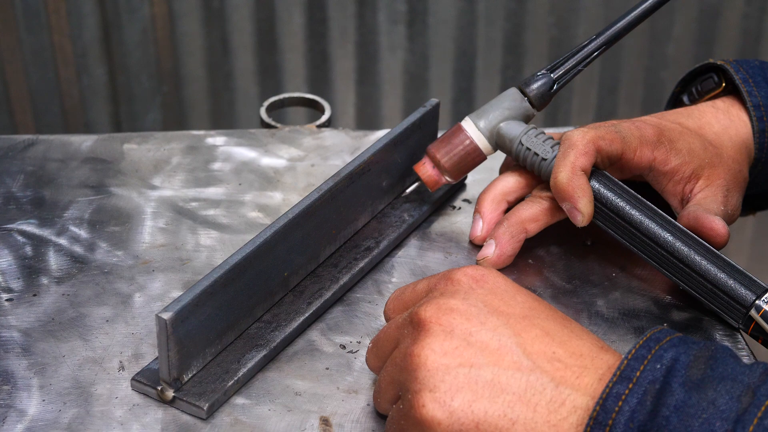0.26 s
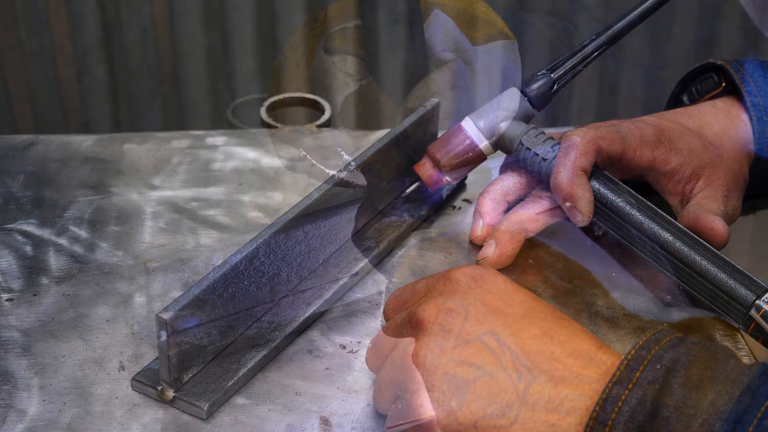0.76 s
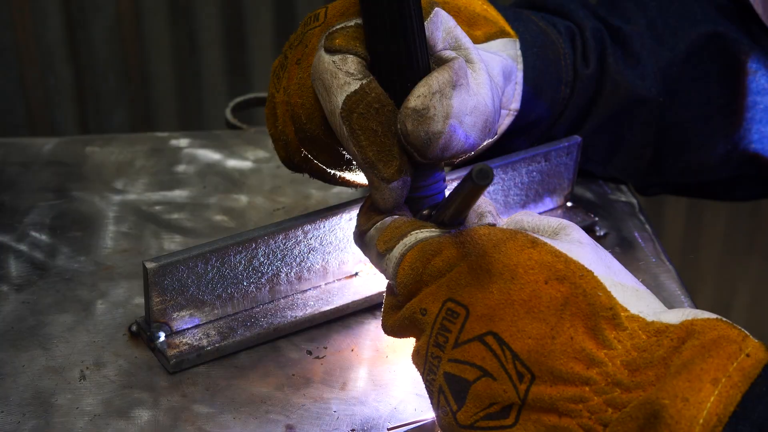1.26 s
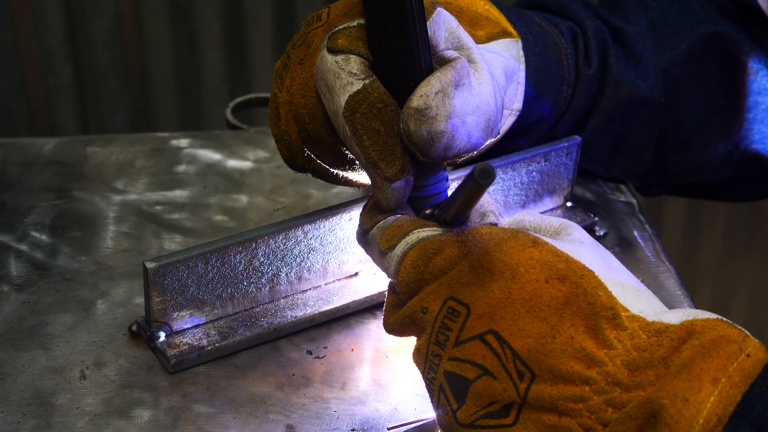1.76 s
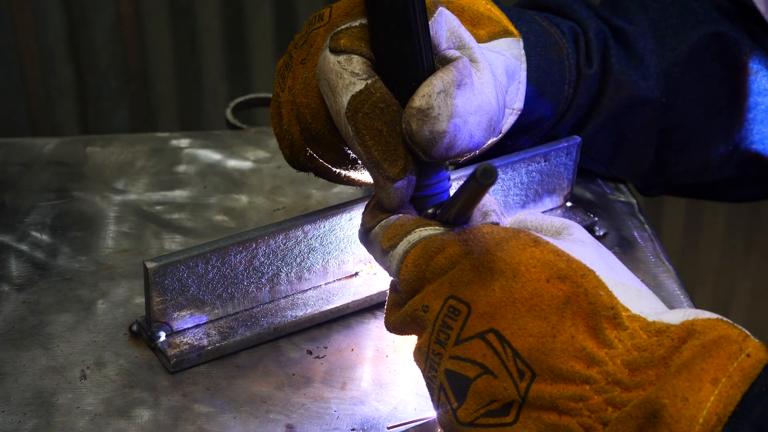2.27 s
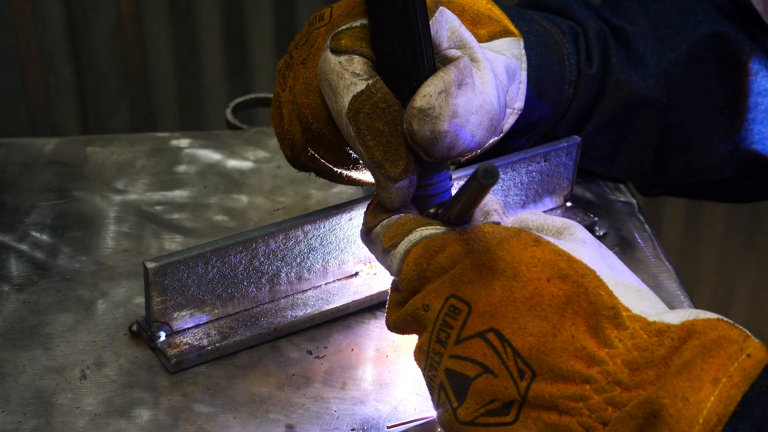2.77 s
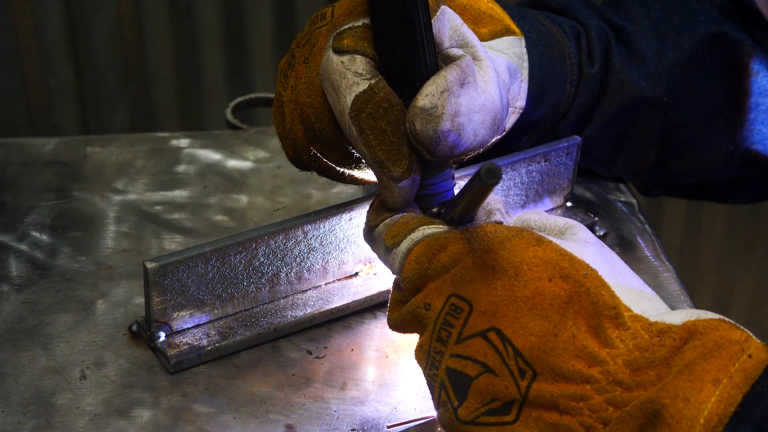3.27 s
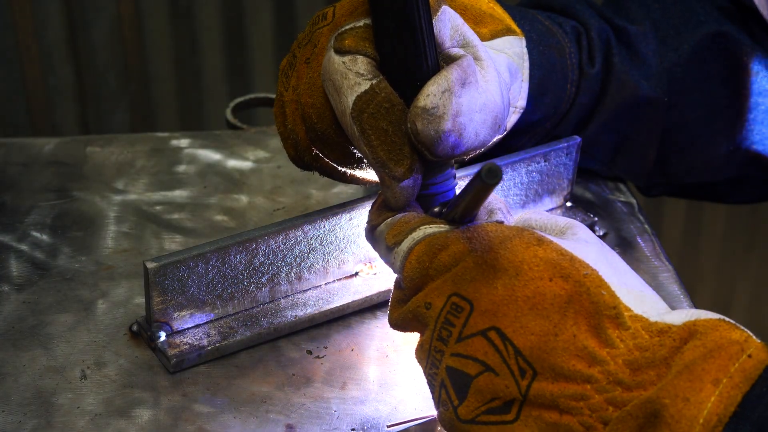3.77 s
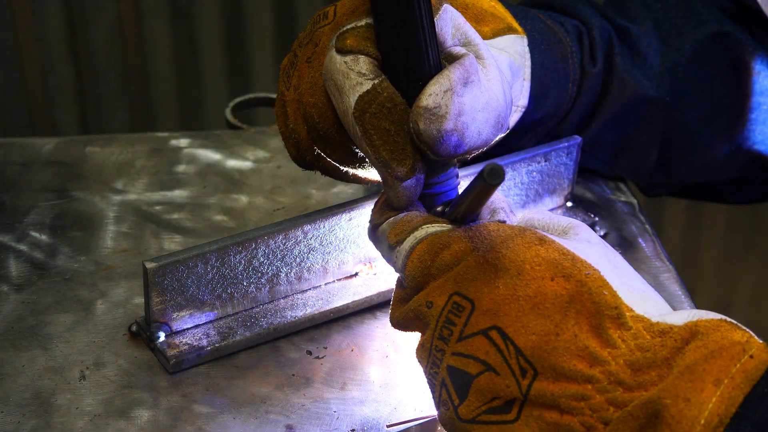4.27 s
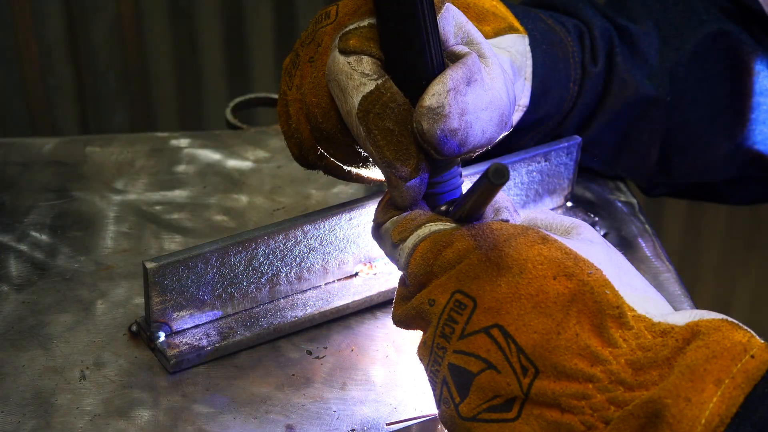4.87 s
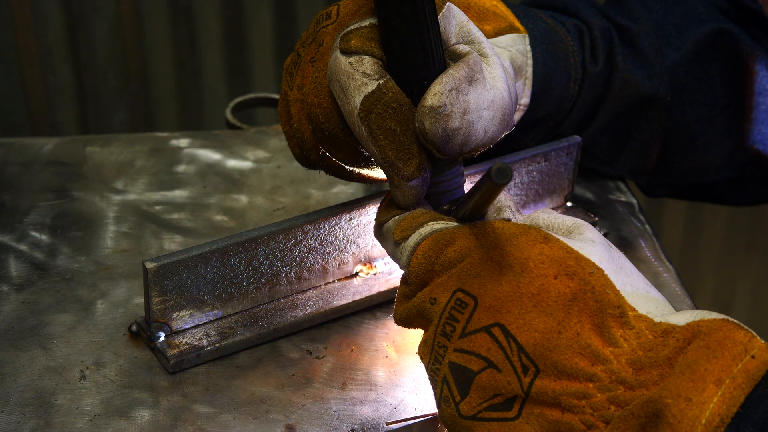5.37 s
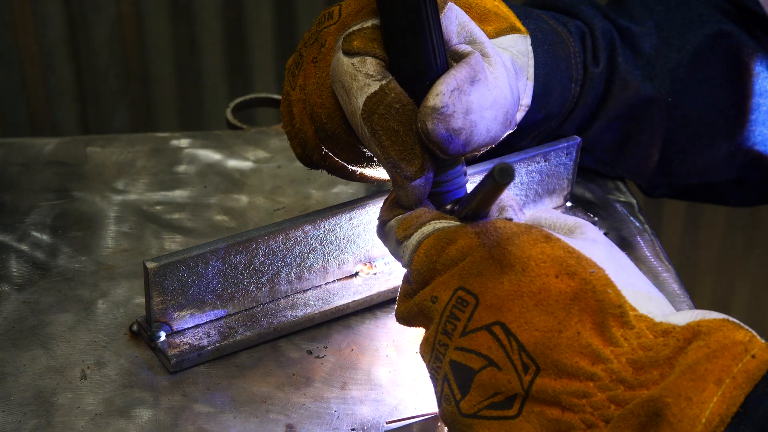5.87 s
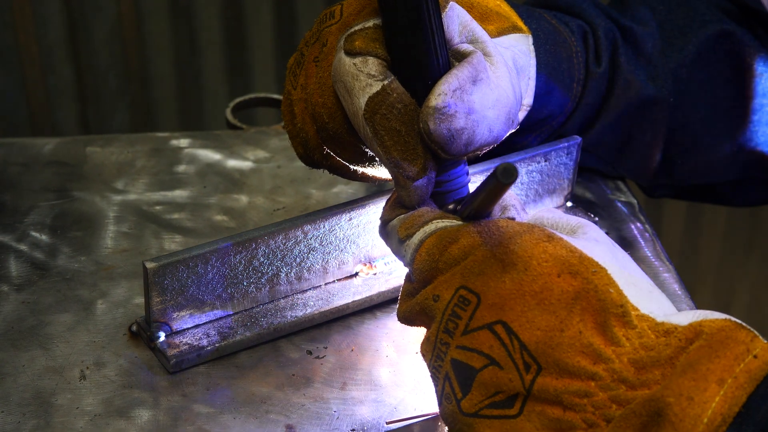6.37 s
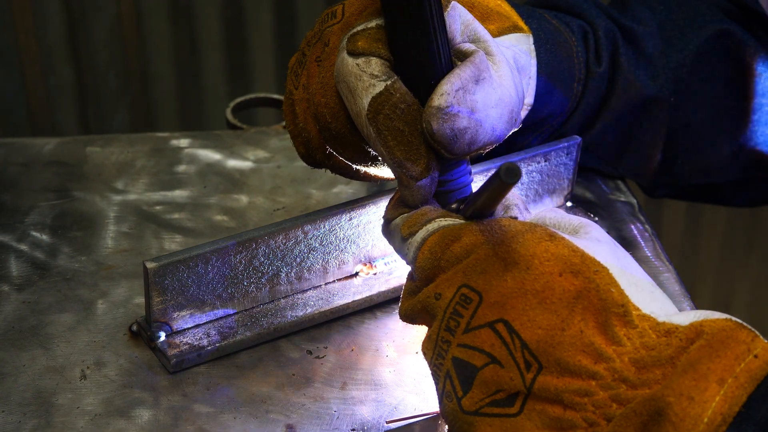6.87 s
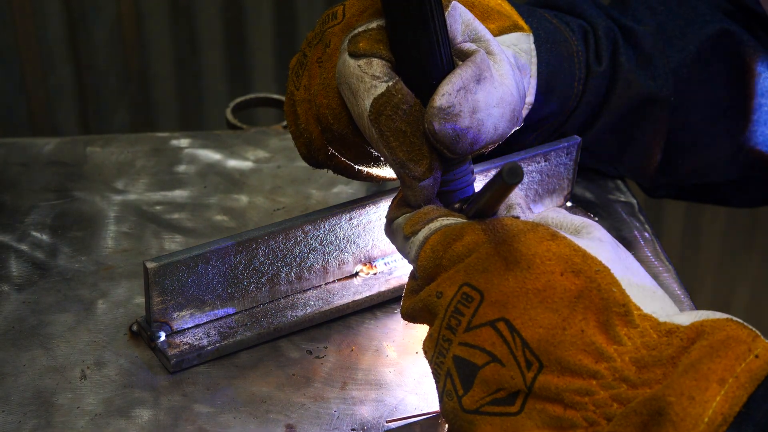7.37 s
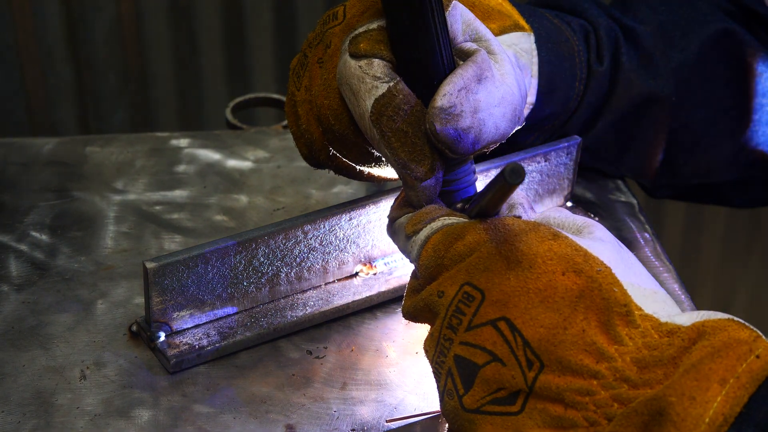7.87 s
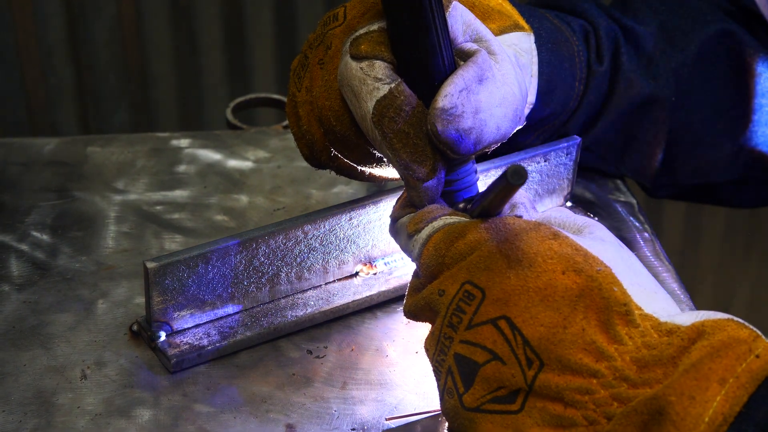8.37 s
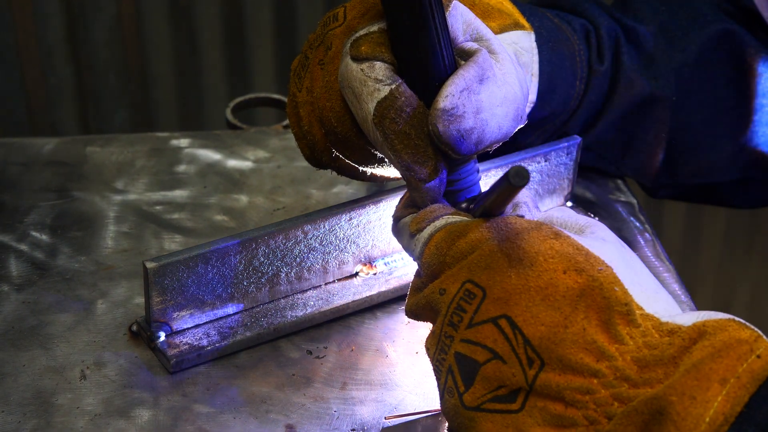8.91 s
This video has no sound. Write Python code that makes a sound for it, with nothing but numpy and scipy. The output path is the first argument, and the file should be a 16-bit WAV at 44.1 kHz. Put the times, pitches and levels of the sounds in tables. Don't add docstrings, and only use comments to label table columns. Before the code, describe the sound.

After a faint idle shop hum and a brief silence, a welding arc bursts in with a dense, steady close hiss until the end.

```python
import sys
import numpy as np
from scipy import signal
from scipy.fft import rfft, irfft
from scipy.io import wavfile
from scipy.ndimage import uniform_filter1d

SR = 44100
rng = np.random.default_rng(int(sys.argv[2]) if len(sys.argv) > 2 else 0)


def pcm_store(signal):
    levels = np.round(np.clip(np.atleast_2d(signal), -1, 1) * 32767)
    wavfile.write(sys.argv[1], SR, levels.astype(np.int16).T)


def volts_from_db(level):
    exponent = np.asarray(level, float) / 20
    return 10 ** exponent


N = 403074
T = np.arange(N) / SR
HZ, FRAMES = np.fft.rfftfreq(2048, 1 / SR), np.arange(N // 512 + 5) * 512 / SR
SHOP_END_S, ARC_START_S = 28875 / SR, 45917 / SR


def evened(x):
    return x / np.sqrt(np.mean(x ** 2) + 1e-20)


def read(points, hz):
    f, value = np.transpose(points)
    return np.interp(np.log(hz + 1), np.log(f + 1), value)


def curves(rows, t):
    s, *columns = np.transpose(rows)
    return [np.interp(t, s, column) for column in columns]


def bell(hz, width):
    return np.exp(-.5 * ((HZ[:, None] - hz) / (width / 2)) ** 2)


def bump(t, s, length):
    return np.exp(-.5 * ((t - s) / length) ** 2)


def shaped(field_db):
    a, b = rng.standard_normal((len(FRAMES), len(HZ), 2)).T
    return signal.istft((a + 1j * b) * volts_from_db(field_db), nperseg=2048, noverlap=1536)[1][:N]


def resonant_noise(hz, width):
    noise = rng.standard_normal(N)
    turn = np.exp(2j * np.pi * np.cumsum(hz * np.ones(N)) / SR)
    r = np.exp(-np.pi * width / SR)
    once = signal.lfilter([1 - r], [1, -r], noise / turn)
    twice = signal.lfilter([1 - r], [1, -r], once)
    return 2 * (turn * twice).real


def steadied(x, hold):
    size = np.sqrt(abs(uniform_filter1d(x ** 2, size=2000))) + 1e-6
    return evened(x / size ** hold)


# hz, level_db (per Hz)
GAS_COLOUR = [(8, -45), (30, -15), (60, -7.5), (150, -14.5), (450, -11), (1200, -14), (1800, -12.5),
              (2300, -4.5), (3500, -5), (4300, -13.5), (5300, -20.5), (8500, -20.5), (10800, -14),
              (14400, -14.5), (15100, -19), (15500, -24), (15900, -26.5)]
# centre_hz, width_hz, level_db,
# change_db (as the torch turns)
JOINT_RESONANCES = [(394, 66, 2.5, 3), (682, 164, 6, 1.5), (822, 137, 6, 1), (943, 45, 3.5, 2.5),
                    (1200, 215, -0.5, 1.5), (1530, 110, 0, 0), (1674, 80, -3, 3.5), (2010, 177, 3.5, 0),
                    (2587, 287, 4, 0), (3100, 220, 4.5, 0.5), (3712, 284, 6, 0.5), (5000, 690, -1.5, -2),
                    (5760, 700, 4.5, 0.5), (6150, 200, -1.5, 0), (6640, 396, 9, -0.5), (6850, 190, 1.5, 4),
                    (7680, 790, 5, 0), (8220, 250, -2.5, -2), (9040, 410, -7, -4), (9590, 370, -6, -4),
                    (9950, 300, 1, -0.5), (10450, 400, -4.5, -1), (11070, 480, 2.5, -1),
                    (12000, 700, 0.5, -1), (13550, 1460, 4, 0), (14900, 500, -0.5, -4),
                    (15550, 820, 2.5, 4)]
# centre_hz, width_hz, level_db
JOINT_DIPS = [(580, 45, -5), (670, 30, -5), (915, 40, -4), (1100, 40, -5), (1172, 40, -10), (1255, 55, -8),
              (1355, 45, -6), (1440, 30, -2), (1620, 40, -2), (2000, 40, -3)]
# time_s, angle (-1 to 1)
TORCH_ANGLE = [
    (1.05, -0.55),
    (4., -.4),
    (5., 0.02),
    (5.9, 0.046),
    (6.9, .55),
    (9.14, .45),
]


def arc():
    level_db, roar_db, patchy_db, flicker_db = -19, .5, .35, .4
    cup_hz, cup_turn_hz, cup_width_hz, cup_db = 9520, 50, 450, -8
    lift_s, lift_length_s, lift_hz = 6.55, .35, -320
    angle, = curves(TORCH_ANGLE, FRAMES)
    moving_cup_hz = cup_hz + cup_turn_hz * angle + lift_hz * bump(FRAMES, lift_s, lift_length_s)
    field_db = read(GAS_COLOUR, HZ)[:, None] + cup_db * bell(moving_cup_hz, cup_width_hz)
    field_db = field_db + roar_db * angle / (1 + (HZ[:, None] / 1000) ** 4)
    for hz, width, db, change_db in JOINT_RESONANCES:
        field_db = field_db + bell(hz, width) * (db + change_db * angle)
    for hz, width, db in JOINT_DIPS:
        field_db = field_db + bell(hz, width) * db
    patches = rng.standard_normal((len(FRAMES), len(HZ))).T
    patches = uniform_filter1d(patches, size=24, axis=0)
    patches = evened(uniform_filter1d(patches, size=20, axis=1))
    hiss = shaped(field_db + patchy_db * patches)
    flicker = evened(uniform_filter1d(rng.standard_normal(N), size=300))
    return evened(hiss) * volts_from_db(level_db + flicker_db * flicker)


# delay_s, strength
WALL_ECHOES = [(.00590, .04), (.00857, .08), (.01177, .1)]


def walls(x):
    dull = signal.lfilter(*signal.butter(2, 1500, fs=SR), x)
    return x + sum(strength * np.roll(dull, round(delay * SR)) for delay, strength in WALL_ECHOES)


# start_s, peak_db, pitch_hz
ROD_KNOCKS = [
    (6.507, -22, 448),
]


def knocks():
    rise_s, t60_s = .008, .055
    out = np.zeros(N)
    for s, db, hz in ROD_KNOCKS:
        t = np.maximum(T - s, 0)
        size = volts_from_db(db + 11.5 - 60 * t / t60_s) * (1 - np.exp(-t / rise_s))
        out += size * np.sin(2 * np.pi * hz * t)
    return out


# time_s, pitch_hz, level_db, share (0-1, second rotor beating against it)
FAN_COURSE = [(1.05, 64, -31.5, 0), (1.86, 63.3, -28, 0), (2., 63.4, -34.5, 0.1), (2.8, 61.7, -44, 0.2),
              (4.1, 59.5, -43.5, .7), (5.4, 61.5, -39.5, .5), (6.05, 61, -43, 0.51), (6.6, 63, -35.5, 0.4),
              (7.3, 63.1, -40, 0.59), (7.6, 63, -35.5, .8), (9.14, 62, -38.5, .9)]


def fan():
    beats_per_s, agree_s = 3.52, 7.55
    clean_db = -38
    hz, level_db, share = curves(FAN_COURSE, T)
    second_rotor = share * np.exp(2j * np.pi * beats_per_s * (T - agree_s))
    beat = abs(1 + second_rotor) / np.sqrt(1 + share ** 2)
    clean = 1 / (1 + volts_from_db(2 * (clean_db - level_db)))
    fuzz = steadied(resonant_noise(hz, width=9), hold=.59)
    tone = np.sqrt(2) * np.sin(2 * np.pi * np.cumsum(hz) / SR)
    return volts_from_db(level_db) * beat * (np.sqrt(1 - clean) * fuzz + np.sqrt(clean) * tone)


def engine():
    pass_s, pass_hz, climb_hz_per_s = 7.5, 77.2, 9.4
    passing = volts_from_db(-34.5) * bump(T, pass_s, .13)
    away = volts_from_db(-43) * bump(T, 8.5, .45)
    note = resonant_noise(pass_hz + climb_hz_per_s * (T - pass_s), width=1.2)
    return (passing + away) * steadied(note, hold=.95)


# pitch_hz, width_hz, level_db
ROOM_MODES = [(203, 13, -46.5), (372, 30, -46), (704, 24, -41), (635, 45, -46), (790, 40, -43.5),
              (1300, 40, -54)]


def room():
    return sum(volts_from_db(db) * evened(resonant_noise(hz, width)) for hz, width, db in ROOM_MODES)


# hz, level_db
SHOP_COLOUR = [(15, -50), (30, -26), (55, -8.5), (72, -12.5), (87, -19), (104, -20), (200, -21),
               (290, -29.5), (830, -32), (1350, -37.5), (2240, -52), (5000, -56), (15600, -61)]
# multiple (of the hum pitch), level_db
HUM_PARTIALS = [(2 / 3, -10), (0.99, 0), (4 / 3, -11)]
# time_s, share_lost (0-1)
HUM_FALTERS = [
    (.13, .65),
    (.284, .9),
]
# pitch_hz, width_hz, level_db
STEEL_RING = [(3950, 330, -2), (4730, 300, 0), (5150, 400, -2), (6000, 1500, -4)]


def shop():
    hum_hz, hum_db, swell_db_per_s, falter_s = 86.8, -39.5, 8, .012
    air_db, ring_db, ring_t60_s = -41, -56, 1.06
    air = evened(shaped(read(SHOP_COLOUR, HZ)[:, None] + 0 * FRAMES))
    hum = evened(sum(volts_from_db(db) * np.sin(2 * np.pi * k * hum_hz * T + k) for k, db in HUM_PARTIALS))
    hum = hum * (1 - sum(lost * bump(T, s, falter_s) for s, lost in HUM_FALTERS))
    swell_db = hum_db + swell_db_per_s * np.minimum(T, SHOP_END_S)
    ring = evened(sum(volts_from_db(db) * evened(resonant_noise(hz, width)) for hz, width, db in STEEL_RING))
    return volts_from_db(air_db) * air + volts_from_db(swell_db) * hum + volts_from_db(ring_db - 60 * T / ring_t60_s) * ring


def scene():
    fade_s = .00005
    welding = walls(arc()) + knocks() + fan() + engine() + room()
    mono = np.clip((SHOP_END_S - T) / fade_s, 0, 1) * shop() + (T >= ARC_START_S) * welding
    return np.array([mono, mono])


# centre_s, low_hz, high_hz
SIDE_FLECKS = [(1.75, 10290, 11750), (2.075, 5140, 6320), (2.075, 7560, 8990), (2.075, 13720, 15170),
               (3.097, 4160, 6930), (3.863, 4200, 5720), (3.933, 4180, 5190), (4.072, 4130, 5180),
               (4.281, 14420, 15820), (5.024, 8940, 11070), (5.605, 9590, 11040), (5.837, 5670, 6940),
               (5.86, 14450, 15870), (7.764, 6850, 8310), (8.019, 8230, 9660), (8.368, 6230, 8290),
               (8.623, 14400, 15890), (8.925, 5630, 6890), (8.925, 10970, 12450)]


def flecks(mono):
    side = np.zeros(N)
    turns = np.exp(2j * np.pi * rng.random((len(SIDE_FLECKS), len(HZ))))
    for (s, low_hz, high_hz), turn in zip(SIDE_FLECKS, turns):
        at = slice(round(s * SR) - 1024, round(s * SR) + 1024)
        band = (HZ > low_hz) * (HZ < high_hz)
        side[at] += irfft(abs(rfft(mono[at])) * turn * band) * np.hanning(2048)
    return volts_from_db(-2) * np.array([side, -side])


def offset():
    level_db, settle_s = -38, .2
    since = np.maximum(T - ARC_START_S, 0)
    step = volts_from_db(level_db) * (T >= ARC_START_S) * np.exp(-since / settle_s)
    return np.array([step, -step])


def low_pass(x):
    return signal.sosfilt(signal.butter(12, 16180, fs=SR, output="sos"), x)


def record(dry):
    edge = signal.firwin(1601, 15775, window=("kaiser", 9), fs=SR)
    limited = signal.oaconvolve(dry, edge[None], "same")
    return low_pass(limited + flecks(dry[0]) + offset())


dry = scene()
out = record(dry)
pcm_store(out)
```